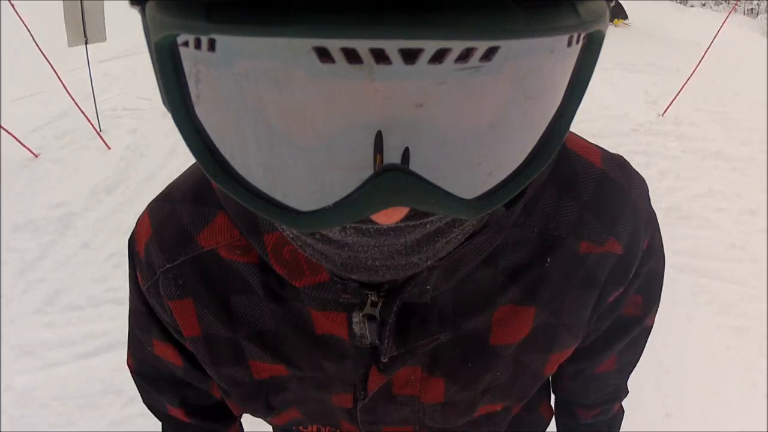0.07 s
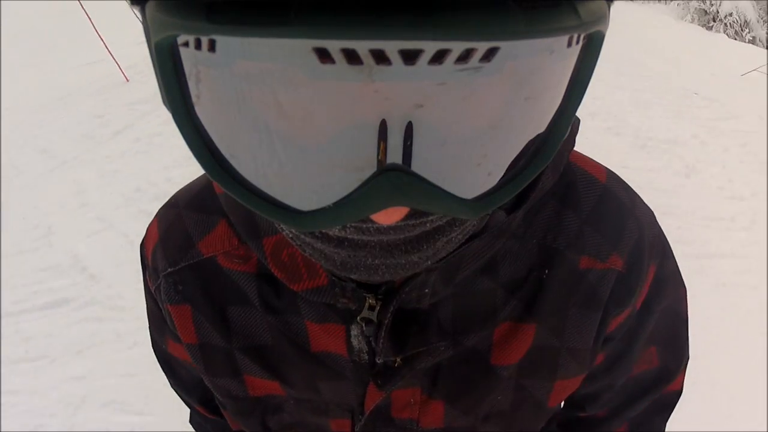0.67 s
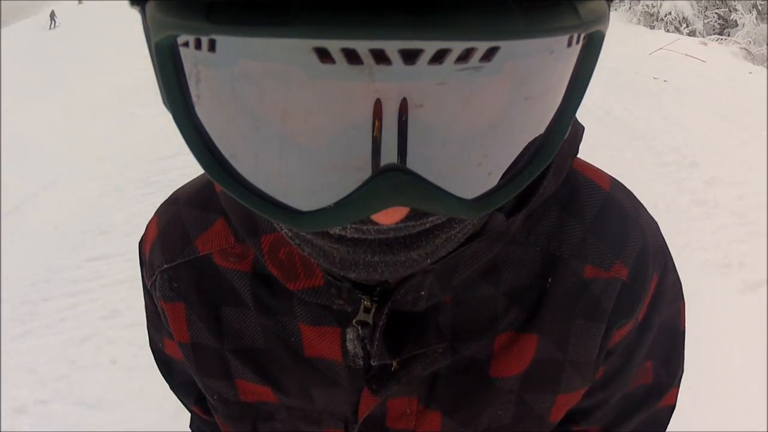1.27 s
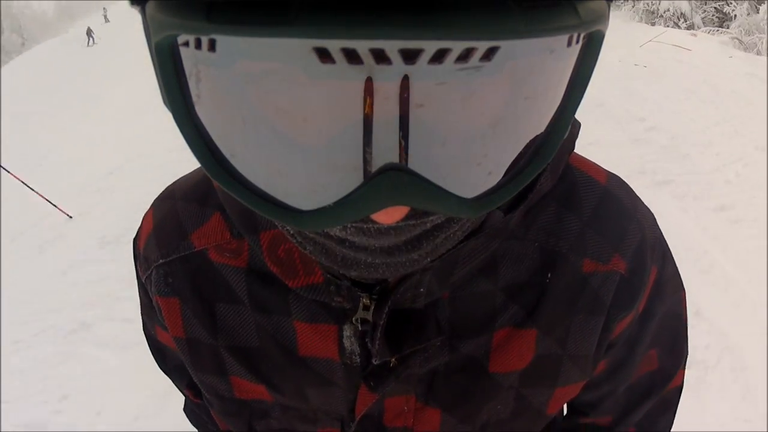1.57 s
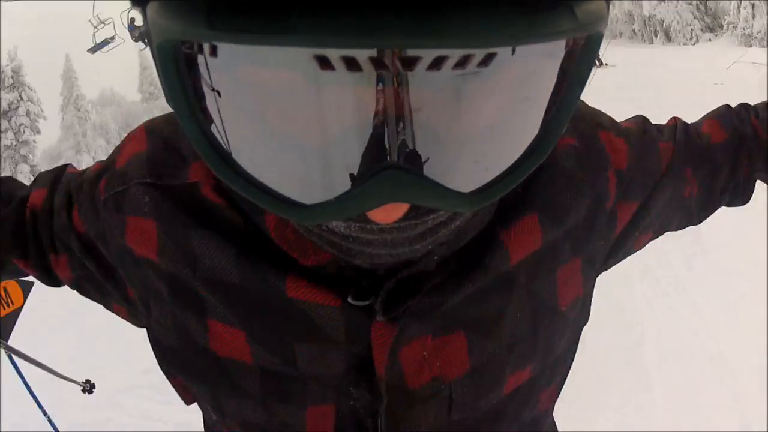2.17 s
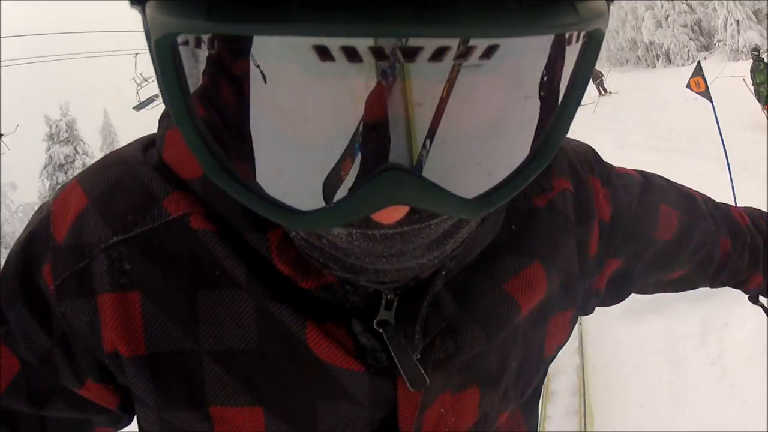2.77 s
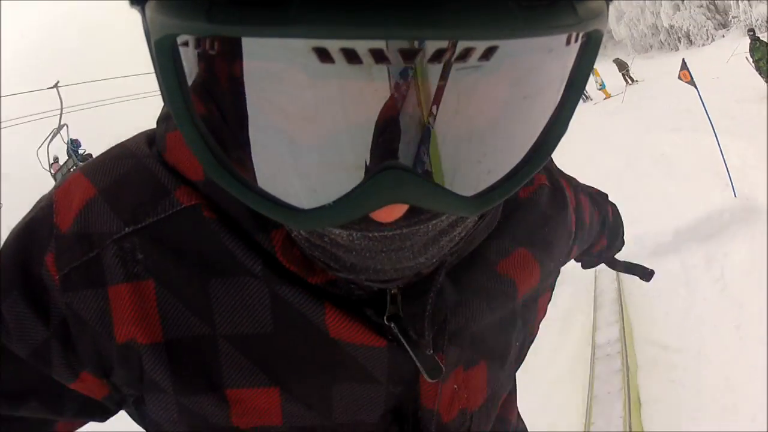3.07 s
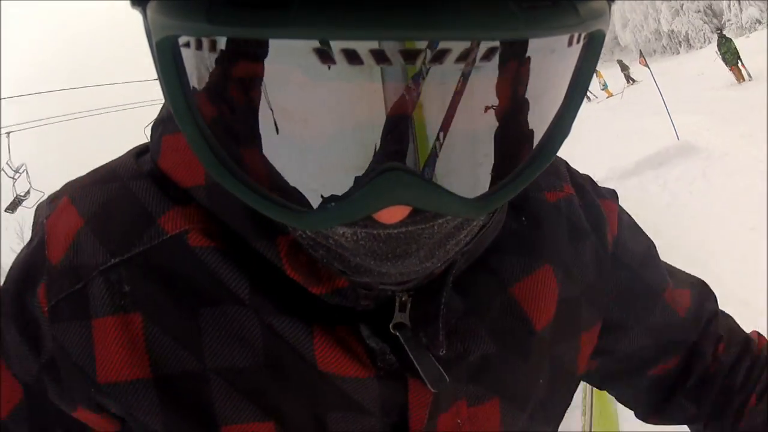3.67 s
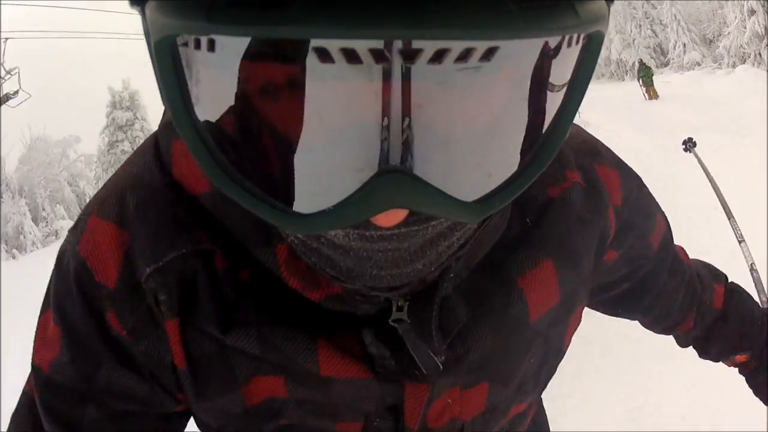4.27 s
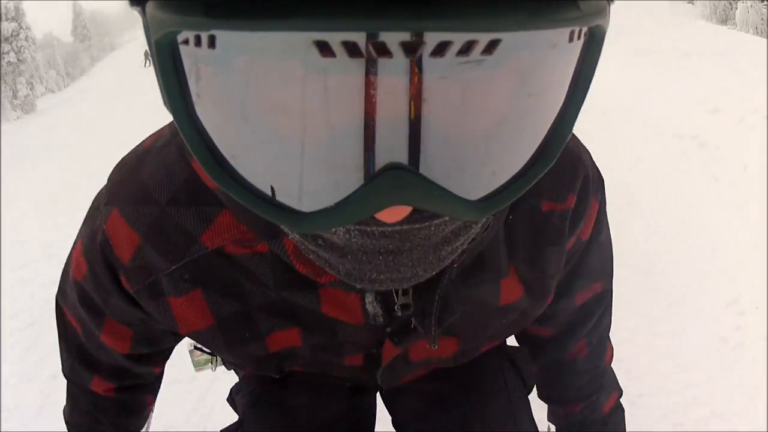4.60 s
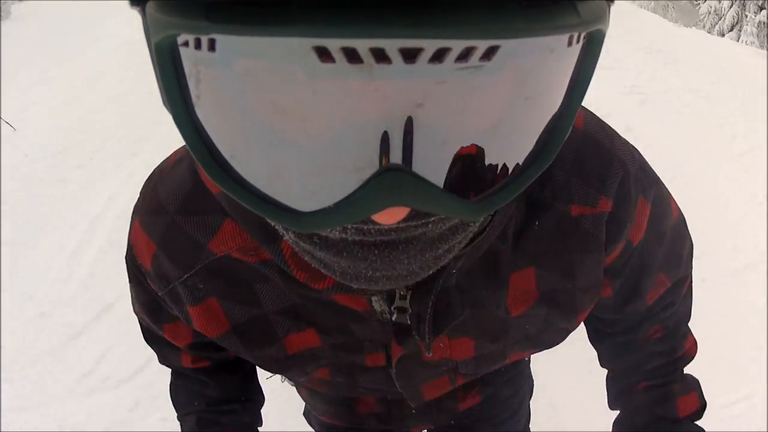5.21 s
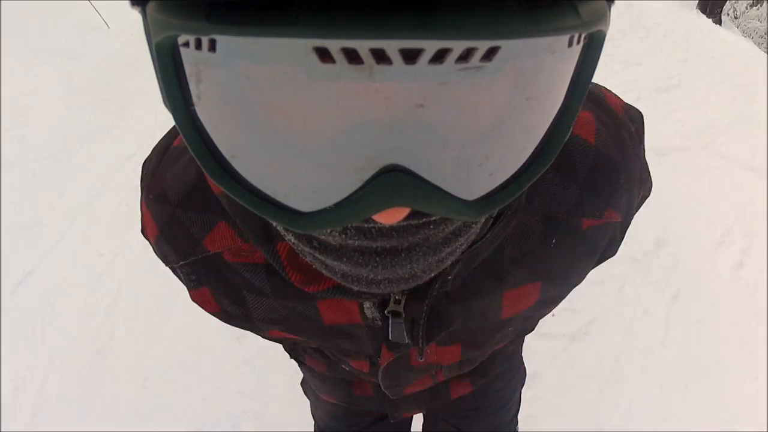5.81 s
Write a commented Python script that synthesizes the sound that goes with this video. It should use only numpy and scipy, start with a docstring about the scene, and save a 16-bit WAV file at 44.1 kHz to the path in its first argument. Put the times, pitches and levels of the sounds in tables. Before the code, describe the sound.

A skier glides, knocks and grinds along a rail and lands hard, with plastic clacks and low wind rumble on the microphone.

```python
"""Skier on a rail

Skis glide over packed snow, jump onto a rail, scrape along it and land hard on the slope beyond.
Their hiss is stick-slip friction: countless tiny slips excite the resonances of the skis.
A camera rides on a hand-held pole in a plastic housing: jolts excite the modes of both, so the housing
clacks and the pole thumps and sways, while wind rumbles. Sample-and-hold on a slow clock mirrors the
spectrum into a gritty treble."""
import sys
import numpy as np
from scipy import signal
from scipy.fft import rfft, irfft
from scipy.io import wavfile
from scipy.ndimage import uniform_filter1d

SR = 44100
rng = np.random.default_rng(int(sys.argv[2]) if len(sys.argv) > 2 else 0)


def transcribe(u):
    """Save the signal u as a 16-bit wav file named by the first command-line argument.

    u: samples, shape (n,) or (channels, n), limited to [-1, 1]; the rate is SR.
    q: integer samples, one column per channel.
    """
    v = np.clip(np.atleast_2d(u).T, -1, 1)
    q = np.round(v * 32767).astype(np.int16)
    wavfile.write(sys.argv[1], SR, q)


N = 266805
TIME = np.arange(N) / SR
START_S = .122
APPROACH_SPAN_S, RAIL_SPAN_S, RUNOUT_SPAN_S = (START_S, 2.14), (2.43, 4.62), (4.66, 5.9)
BUMPY_RAIL_SPAN_S = (2.43, 3.48)


def from_db(db):
    """Amplitude ratio of a level in decibels."""
    return 10 ** (np.asarray(db) / 20)


def rms_one(x):
    """Normalisation to unit mean power."""
    return x / np.sqrt(np.mean(x ** 2) + 1e-20)


def peak_one(rings):
    """Normalisation of each row to unit short-time power at its loudest moment."""
    power = uniform_filter1d(rings ** 2, size=60)
    return rings / np.sqrt(power.max(axis=-1, keepdims=True))


def add(out, s, sound):
    """Superposition of a short sound at time s."""
    at = int(s * SR)
    out[at:at + len(sound)] += sound[:N - at]


def in_time(rows):
    """Linear interpolation of (time, value) rows at every sample."""
    return np.interp(TIME, *np.transpose(rows))


def swells(rows):
    """Sum of Gaussian envelopes, one per row of (time, level, half-width)."""
    return sum(from_db(db) * np.exp(-np.minimum(((TIME - s) / width) ** 2, 50)) for s, db, width in rows)


def drift(rate_hz):
    """Low-pass random modulation of unit spread."""
    hz = np.arange(N // 2 + 1) * SR / N
    return rms_one(irfft(rfft(rng.standard_normal(N)) / (1 + (hz / rate_hz) ** 2), N))


def coloured(x, spectrum, band=None):
    """Spectral shaping between steep band edges, at unit power."""
    hz = np.maximum(np.arange(N // 2 + 1) * SR / N, 1)
    points, db = np.transpose(spectrum)
    low, high = band or (points[0], points[-1])
    edges = 1 / np.sqrt((1 + (low / hz) ** 24) * (1 + (hz / high) ** 24))
    shape = from_db(np.interp(np.log(hz), np.log(points), db))
    return rms_one(irfft(rfft(x) * edges * shape, N))


def rumble(spectrum, even_s):
    """Shaped noise whose power is held even over stretches of even_s."""
    noise = coloured(rng.standard_normal(N), spectrum)
    return noise / np.sqrt(uniform_filter1d(noise ** 2, size=int(even_s * SR)))


def resonate(x, hz, width_hz):
    """Damped two-pole resonator with unit peak gain."""
    r = np.exp(-np.pi * width_hz / SR)
    feedback = [1, -2 * r * np.cos(2 * np.pi * hz / SR), r * r]
    return signal.lfilter(np.array([1, 0, -1]) * (1 - r * r) / 2, feedback, x + 1e-18)


def scattered(span, levels_db, spread_db, count):
    """Stratified random events: one row of (time, levels) in each equal part of a span."""
    s = span[0] + (np.arange(count) + rng.random(count)) / count * (span[1] - span[0])
    return np.column_stack([s, levels_db + spread_db * rng.uniform(-1.4, 1, (count, len(levels_db)))])


def blows(count, rattle_db, rattle_t60, lead_s=0.0, lead_t60=.001):
    """Impact forces, one a row: an impulse at lead_s amid tiny contacts that build up and die away."""
    age = TIME[:SR // 16] - lead_s
    fade_db = -60 * np.where(age < 0, -age / lead_t60, age / rattle_t60)
    force = rng.standard_normal((count, len(age))) * from_db(rattle_db + fade_db)
    force[:, int(lead_s * SR)] += 1
    return force


# Spectrum of the background hiss: (frequency [Hz], relative level [dB])
FLOOR_SPECTRUM = [(1500, -9), (3500, -5), (4500, -4.5), (5800, -8.5)]


def noise_floor(level_db=-72):
    """Stationary band-limited noise, heard as a faint hiss."""
    return from_db(level_db) * coloured(rng.standard_normal(N), FLOOR_SPECTRUM)


# Strength of the wind: (time [s], relative level [dB])
WIND_LEVELS = [(0.14, -55), (0.32, -54), (1.13, -58), (2.08, -54), (2.4, -34.5), (2.76, -39.5),
               (2.94, -48.5), (3.2, -47), (3.41, -42), (3.83, -58), (4.14, -41.5), (4.25, -49.5),
               (4.57, -37), (4.71, -41.5), (4.81, -54), (5.44, -56), (5.72, -46.5), (6.05, -61.5)]
# Its spectrum: (frequency [Hz], relative level [dB])
WIND_SPECTRUM = [(18, 5.5), (28, 3.5), (38, 3), (50, -16), (75, -2)]


def wind(gain_db=4.5):
    """Turbulent pressure on the housing gives a deep rumble."""
    return from_db(in_time(WIND_LEVELS) + gain_db) * rumble(WIND_SPECTRUM, even_s=.153)


# Spectrum of the shuddering pole: (frequency [Hz], relative level [dB])
SHUDDER_SPECTRUM = [(68, -14.5), (94, 3.5), (122, -8), (153, -4), (190, -16), (225, -20.5)]


def shudder(on_rail, snow_db=-51.5, rail_db=-57, kick_db=-19, t60_s=.39):
    """Forced vibration of the pole: steady on snow, weaker on the rail, swelling at each main clack."""
    power = from_db(snow_db + on_rail * (rail_db - snow_db)) ** 2
    decay = from_db(kick_db - 60 * TIME[:SR] / t60_s)
    for s, knock_db, *_ in CLACKS:
        add(power, s, (from_db(knock_db) * decay) ** 2)
    return np.sqrt(uniform_filter1d(power, size=400)) * rumble(SHUDDER_SPECTRUM, even_s=.14)


# Spectrum of the low rush under the skis: (frequency [Hz], relative level [dB])
RUSH_SPECTRUM = [(130, -19), (220, -6.5), (284, -7.5), (319, 0), (334, -1.5), (357, -11), (401, -6),
                 (443, -12.5), (612, -16.5), (687, -10.5), (930, -9), (1000, -4.5), (1100, -18.5),
                 (1430, -45), (2420, -120)]


def sliding(gains, spectrum, slips_per_s, size_db, chatter_db, chatter_hz, catch_db, catch_hz):
    """Stick-slip friction: tiny slips, modulated by chatter, ring the skis over a smoother low rush."""
    rush_gain, hiss_gain, grit_gain = gains
    sizes = from_db(size_db * np.minimum(rng.exponential(1, N), 5)) * rng.choice([-1, 1], N)
    slipping = rng.random(N) < slips_per_s / SR
    slips = sizes * slipping * from_db(chatter_db * drift(chatter_hz))
    rings = np.zeros(N)
    # the edges catch now on one resonance of the skis, now on another
    for k, hz in enumerate(np.geomspace(1100, 5800, 14)):
        rings += (-1) ** k * resonate(slips, hz, hz / 10) * from_db(catch_db * drift(catch_hz))
    hiss = hiss_gain * coloured(rings, spectrum, band=(1050, 2550))
    grit = grit_gain * coloured(rings, spectrum, band=(2550, 5900))
    rush = rush_gain * coloured(rng.standard_normal(N), RUSH_SPECTRUM)
    return hiss + grit + rush


def glide_gains(levels, grit_db, rush_db=-56.5, reference_db=-53, rush_share=.34):
    """Coupled gains of rush, hiss and grit: the grit follows the hiss fully, the rush only in part."""
    hiss_db = in_time(levels)
    return from_db([rush_db + rush_share * (hiss_db - reference_db), hiss_db, hiss_db + grit_db])


# Hiss of the skis before the jump: (time [s], level [dB])
APPROACH_LEVELS = [(.13, -61), (.3, -52.5), (.5, -52.5), (.7, -57.5), (.88, -53.5), (1.04, -59.5),
                   (1.45, -56.5), (1.68, -53.5), (2.13, -52)]
# Its spectrum: (frequency [Hz], relative level [dB])
APPROACH_SPECTRUM = [(1000, -26), (1150, -11.5), (1370, 1), (1600, -10), (2000, -2), (2350, -8),
                     (2650, -17), (3000, -8.5), (3400, -7), (3900, -11.5), (5000, -18.5), (5800, -23.5)]


def approach():
    """Friction on packed snow: dense slips merge into an even hiss."""
    return sliding(glide_gains(APPROACH_LEVELS, grit_db=-12.5), APPROACH_SPECTRUM, slips_per_s=12000,
                   size_db=3.5, chatter_db=.7, chatter_hz=35, catch_db=1.2, catch_hz=25.2)


# Hiss of the skis after the landing: (time [s], level [dB])
RUNOUT_LEVELS = [(4.66, -54), (5.0, -53.5), (5.3, -54), (5.41, -58), (5.52, -57), (5.8, -59), (6.05, -64)]
# Its spectrum: (frequency [Hz], relative level [dB])
RUNOUT_SPECTRUM = [(1000, -30), (1170, -6), (1350, 4.5), (1580, -5), (2000, 2), (2330, -2.5), (2600, -15.5),
                   (3000, -13), (3500, -12.5), (3900, -18.5), (5000, -22.5), (5800, -26)]


def runout():
    """Friction on icier snow: sparser slips and more grit."""
    return sliding(glide_gains(RUNOUT_LEVELS, grit_db=-7.5), RUNOUT_SPECTRUM, slips_per_s=4000,
                   size_db=2.5, chatter_db=.7, chatter_hz=50.7, catch_db=1.5, catch_hz=30.1)


# Skids across hard snow: (centre time [s], level [dB], half-width [s])
SKIDS = [(5.66, -44.5, 0.066), (5.8, -46.5, .03)]
# Their spectrum: (frequency [Hz], relative level [dB])
SKID_SPECTRUM = [(1400, 2), (1750, -5.5), (2050, 9), (2350, -2), (2650, -12), (3400, -5), (3900, -17),
                 (5800, -20.5)]


def skids(chatter_db=3.0, chatter_hz=60):
    """Sideways friction of the edges: thin, bright noise, amplitude-modulated by chatter."""
    scrape = rng.standard_normal(N) * from_db(chatter_db * drift(chatter_hz))
    return swells(SKIDS) * coloured(scrape, SKID_SPECTRUM)


# Crashes of heavy blows, on the rail and in the snow: (centre time [s], level [dB], half-width [s])
CRUNCHES = [(2.273, -29, .012), (4.382, -31, .01), (4.513, -39, .006), (4.59, -41.5, 0.016)]
# Its spectrum: (frequency [Hz], relative level [dB])
CRUNCH_SPECTRUM = [(180, 5.5), (420, -1), (650, -7), (1000, -4), (1600, 2.5), (2400, 0.5), (3400, -8),
                   (5800, -18.5)]


def crunches(grain_db=-.5, grain_hz=300):
    """Short, coarse bursts of noise: the skis crash onto the rail, and packed snow gives way at the landing."""
    grains = rng.standard_normal(N) * from_db(grain_db * drift(grain_hz))
    return swells(CRUNCHES) * coloured(grains, CRUNCH_SPECTRUM)


# Grips from take-off to landing, in relative levels: (time [s], rush [dB], hiss [dB], grit [dB])
GRIPS = [(2.14, -51.5, -55, -56.5), (2.3, -51.5, -51.5, -61), (2.428, -53, -41.5, -45),
         (2.66, -55, -42, -47.5), (2.9, -57, -45.5, -49.5), (3.17, -55.5, -56, -65),
         (3.29, -52.5, -49, -51), (3.48, -58.5, -42.5, -50.5), (4.0, -54, -47, -52.5),
         (4.19, -52.5, -48, -61.5), (4.33, -49.5, -47, -51)]
# Spectrum of skis on the rail: (frequency [Hz], relative level [dB])
RAIL_SPECTRUM = [(620, -54), (1050, -20.5), (1380, 11.5), (1500, 2), (1740, 6.5), (1880, 5.5), (2160, 3),
                 (2400, 0.5), (2710, -11), (2950, -2), (3350, -19.5), (3570, -6), (3890, -20.5),
                 (4810, -15.5), (5700, -19.5), (7410, -54), (12500, -120)]


def rail_grind(gain_db=-1.5, sag_db_per_s=9.5, change_s=.016, waver_db=1.17, waver_hz=30):
    """Friction under varying load: each grip bites at once, then wavers and eases until the next."""
    grips = np.array(GRIPS)
    current = np.maximum(np.searchsorted(grips[:, 0], TIME) - 1, 0)
    s, rush_db, hiss_db, grit_db = grips[current].T
    pressure_db = waver_db * drift(waver_hz) - sag_db_per_s * np.maximum(TIME - s, 0)
    levels_db = [rush_db, hiss_db + pressure_db, grit_db + pressure_db]
    gains = from_db(uniform_filter1d(levels_db, size=int(change_s * SR), axis=1) + gain_db)
    return sliding(gains, RAIL_SPECTRUM, slips_per_s=6000,
                   size_db=1.0, chatter_db=2.5, chatter_hz=59, catch_db=2.4, catch_hz=39.6)


# An edge catches on the rail: (centre time [s], frequency [Hz], level [dB], half-width [s])
SQUEAKS = [(2.446, 1520, -27.5, 0.014), (2.643, 2870, -36.5, 0.009), (2.698, 2390, -38, 0.018),
           (2.803, 1510, -39, .014), (2.889, 2680, -38, 0.0052), (3.304, 1630, -35.5, 0.006),
           (3.338, 1680, -32.5, 0.0036), (3.95, 2250, -39, 0.0026)]


def squeaks(width_hz=220):
    """Friction briefly excites one narrow resonance."""
    out, age = np.zeros(N), TIME[:SR // 8]
    middle = age.mean()
    for s, hz, db, half_width in SQUEAKS:
        friction = rng.standard_normal(len(age))
        tone = resonate(resonate(friction, hz, width_hz), hz, width_hz)
        swell = np.exp(-((age - middle) / half_width) ** 2)
        add(out, s - middle, peak_one(tone * swell) * from_db(db))
    return out


# Ticks of ice and loose fittings: (time [s], level [dB])
TICKS = [(.6028, -54.5), (1.598, -56), (1.921, -56), (2.1906, -44), (2.2713, -32.5), (2.3414, -46),
         (2.4054, -39), (2.5103, -38.5), (2.683, -43), (3.0234, -45), (3.235, -47), (3.3512, -40),
         (4.1764, -48.5), (4.33, -41), (4.4125, -44), (4.6116, -47), (5.847, -56)]
# Their modes: (frequency [Hz], bandwidth [Hz], relative level [dB])
TICK_MODES = [(2090, 200, 6), (3070, 450, 6.5), (3420, 560, 2.5), (4630, 360, -10), (5200, 310, -58)]


def ticks():
    """Impulse excitation: small hard contacts ring high modes at once; fainter ones fall at random."""
    on_bumps = scattered(BUMPY_RAIL_SPAN_S, levels_db=[-53], spread_db=8, count=4)
    stray = scattered((START_S, RUNOUT_SPAN_S[1]), levels_db=[-64], spread_db=11, count=14)
    contacts = np.vstack([TICKS, on_bumps, stray])
    force = blows(len(contacts), rattle_db=-21.5, rattle_t60=.033)
    rings = sum(peak_one(resonate(force, hz, width)) * from_db(db) for hz, width, db in TICK_MODES)
    out = np.zeros(N)
    for (s, db), ring in zip(contacts, rings):
        add(out, s, ring * from_db(db))
    return out


def swing(db, hz, rise_s, t60_s):
    """One second of a damped oscillation with a gradual onset."""
    age = TIME[:SR]
    envelope = (1 - np.exp(-(age / rise_s) ** 2)) * from_db(-60 * age / t60_s)
    return -np.sin(2 * np.pi * hz * age) * envelope / envelope.max() * from_db(db)


# Modes of the pole: (frequency [Hz], relative level [dB], rise time [s], 60 dB decay time [s])
POLE_MODES = [(27.23, 1, .012, 0.49), (51, -6, 0.0012, 0.13), (94.6, 1.5, 0.0023, 0.18),
              (146.5, -7, 0.00043, 0.22), (224, -2.5, 0.00029, 0.046), (323, -3, 0.0012, 0.043),
              (960, 1.5, 0.00011, 0.016)]
# Jolts through the pole: (time [s], slow sway [dB], flex [dB], hollow knock [dB], hard rap [dB])
JOLTS = [(2.235, -23.5, -30.5, -49, -55), (2.267, -26.5, -18.5, -25, -17), (2.348, -48, -15, -39, -46),
         (2.428, -22.5, -39, -34, -43), (2.565, -42, -29, -61, -60), (3.343, -23.5, -38, -64, -62),
         (3.73, -30, -70, -75, -75), (4.082, -40, -34, -40, -46), (4.381, -29.5, -20, -18, -41),
         (4.435, -20.5, -24, -55, -60), (4.51, -46, -27, -44, -26), (4.587, -40, -17.5, -42, -55)]
JOLT_REGISTERS_HZ = [48, 94, 220, 900]  # sway, flex, knock, rap


def thumps():
    """Free vibration: each jolt rings the modes of the pole, and the landing adds one heavy heave."""
    out = np.zeros(N)
    for hz, db, rise_s, t60_s in POLE_MODES:
        ring = swing(db, hz, rise_s, t60_s)
        for s, *levels_db in JOLTS:
            add(out, s, ring * from_db(np.interp(hz, JOLT_REGISTERS_HZ, levels_db)))
    heave = swing(db=-8, hz=47, rise_s=.05, t60_s=.075)
    add(out, s=4.3765, sound=heave)
    return out


def clack_contacts(delay_s=(.004, .017), loss_db=17.5, spread_db=3.5):
    """Primary and secondary impacts: main clacks, a rattle of the mount after each, and faint bumps."""
    main = np.array(CLACKS)
    rattle_s = main[:, 0] + rng.uniform(*delay_s, len(main))
    rattle_db = main[:, 1:] - loss_db + spread_db * rng.standard_normal((len(main), 3))
    return np.vstack([main, np.column_stack([rattle_s, rattle_db]),
                      scattered(RAIL_SPAN_S, levels_db=[-42, -40, -52], spread_db=-.5, count=16),
                      scattered(APPROACH_SPAN_S, levels_db=[-55, -53, -58], spread_db=-10, count=8),
                      scattered(RUNOUT_SPAN_S, levels_db=[-53, -49, -54], spread_db=5, count=8)])


# Modes of the housing: (frequency [Hz], bandwidth [Hz], relative level [dB])
HOUSING_MODES = [(435, 400, -24.5), (914, 150.5, -15.5), (1359, 219.4, -4), (1971, 443, -6),
                 (2027, 423.8, -5.5), (2740, 1140, -16), (3267, 444.4, -2.5), (3820, 263, -20),
                 (4730, 2650, -20.5)]
# Clacks of skis, pole and housing: (time [s], low knock [dB], middle clack [dB], high bite [dB])
CLACKS = [(.604, -56, -49, -47.5), (2.1501, -26, -18.5, -21.5), (2.172, -24, -31, -42),
          (2.181, -37, -25, -44), (2.2081, -19, -14.5, -33), (2.2459, -29, -19, -20.5),
          (2.263, -34, -33, -45), (2.2791, -27, -13, -18.5), (2.296, -26.5, -26, -66),
          (2.3452, -30, -34, -46), (2.3554, -23.5, -23, -38), (2.407, -38, -25.5, -59),
          (2.4338, -15, -15, -24), (2.4564, -36, -26.5, -40), (2.536, -27.5, -23.5, -32),
          (2.597, -31.5, -21.5, -26), (2.9663, -34, -26, -31.5), (2.9743, -33, -23.5, -28),
          (3.1702, -36, -43, -31.5), (3.1763, -25.5, -22, -25.5), (3.282, -41, -29, -42),
          (3.2863, -29.5, -21.5, -26.5), (3.3325, -31.5, -25, -45), (3.3829, -35, -23.5, -28),
          (3.3879, -38, -26, -30.5), (3.417, -40, -29, -30.5), (3.47, -40, -26.5, -37),
          (3.998, -35, -43, -48), (4.0041, -40, -29, -31.5), (4.012, -29.5, -21.5, -25),
          (4.079, -25, -25, -33), (4.1228, -29.5, -34, -56), (4.1641, -19, -12.5, -34),
          (4.259, -42, -39, -36), (4.2706, -31.5, -21, -25.5), (4.3512, -26.5, -29.5, -38),
          (4.376, -24.5, -36, -47), (4.3834, -31, -23, -39), (4.4042, -21.5, -13.5, -39),
          (4.5135, -32, -34.5, -49), (4.5347, -28.5, -18.5, -22), (4.817, -48, -39, -46),
          (5.3636, -50, -33.5, -44)]
CLACK_REGISTERS_HZ = [1350, 2000, 3300]  # knock, clack, bite


def clacks(lead_s=.008, early_s=.0005, widening=1.504, bounce_gain=.54, bounce_s=.002372):
    """Resonators in cascade: blows cross pole, mount and housing, so each mode swells and soon dies."""
    contacts = clack_contacts()
    count = len(contacts)
    force = blows(count, rattle_db=-27, rattle_t60=.024, lead_s=lead_s, lead_t60=.0052)
    # the loose mount strikes a second time straight away
    rebound_s = lead_s + bounce_s * rng.uniform(.8, 1.2, count)
    force[np.arange(count), (rebound_s * SR).astype(int)] += bounce_gain
    out = np.zeros(N)
    for hz, width_hz, mode_db in HOUSING_MODES:
        rings, swell_s = force, 0
        for width in (width_hz, width_hz * widening, width_hz * widening):
            rings = resonate(rings, hz, width)
            swell_s += 1 / (np.pi * width)
        # each mode starts ahead by its own delay, so all peak near the moment of the clack
        for (s, *levels_db), ring in zip(contacts, peak_one(rings)):
            blow_db = np.interp(hz, CLACK_REGISTERS_HZ, levels_db)
            add(out, s - lead_s - swell_s - early_s, ring * from_db(blow_db + mode_db))
    return out


def scene():
    """Superposition: snow, rail and run-out join in equal-power crossfades under the jolts and wind."""
    past_lip = np.clip((TIME - 2.13) / .02, 0, 1)
    past_landing = np.clip((TIME - 4.64) / .03, 0, 1)
    on_rail = past_lip - past_landing
    skis = approach() * np.sqrt(1 - past_lip)
    skis += rail_grind() * np.sqrt(on_rail)
    skis += runout() * np.sqrt(past_landing)
    skis += skids() + squeaks()
    impacts = clacks() + ticks() + thumps() + crunches()
    background = wind() + shudder(on_rail) + noise_floor()
    return (skis + impacts + background)[None]


def record(dry, clock_hz=12000, antialias_hz=5750, cutoff_hz=15600):
    """Zero-order hold: holding each slow sample mirrors the spectrum about the clock frequency."""
    live = dry * np.clip((TIME - START_S) / .005, 0, 1)  # silence until START_S
    narrow = signal.sosfilt(signal.ellip(8, .2, 60, antialias_hz, fs=SR, output="sos"), live)
    slow = signal.resample_poly(narrow, 4 * clock_hz, SR, axis=1)[:, ::4]
    staircase = np.repeat(slow, 4, axis=1)
    held = signal.resample_poly(staircase, SR, 4 * clock_hz, axis=1)[:, :N]
    return signal.sosfilt(signal.ellip(8, .2, 80, cutoff_hz, fs=SR, output="sos"), held)


dry = scene()
out = record(dry)
transcribe(out)
```